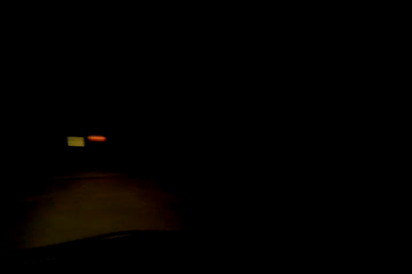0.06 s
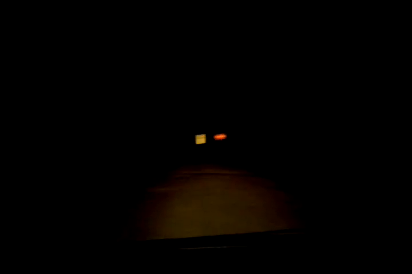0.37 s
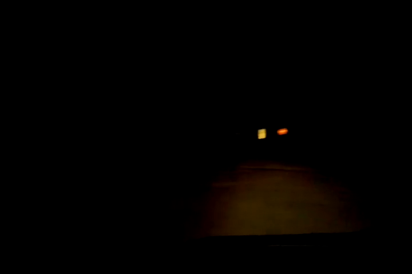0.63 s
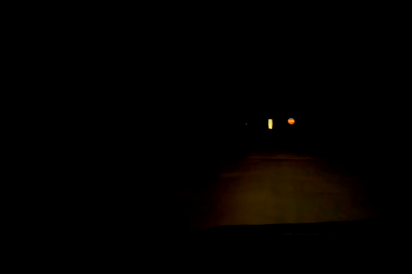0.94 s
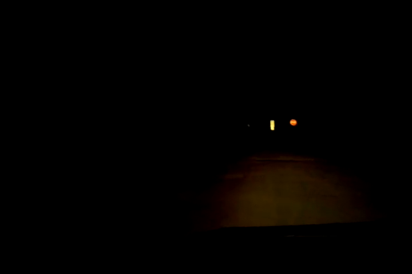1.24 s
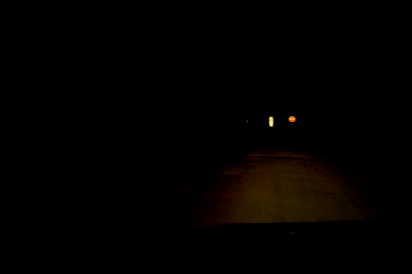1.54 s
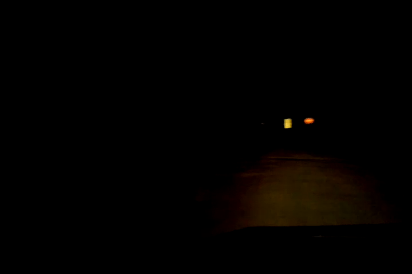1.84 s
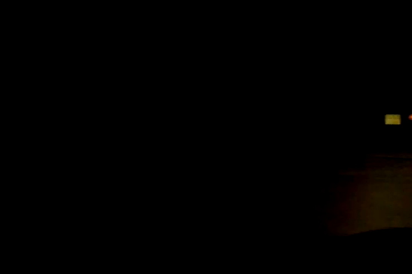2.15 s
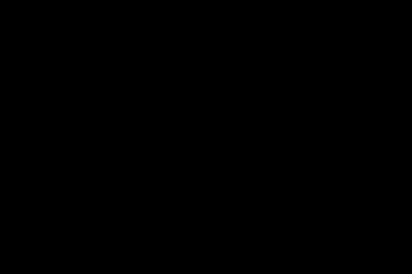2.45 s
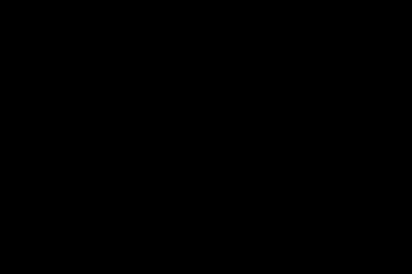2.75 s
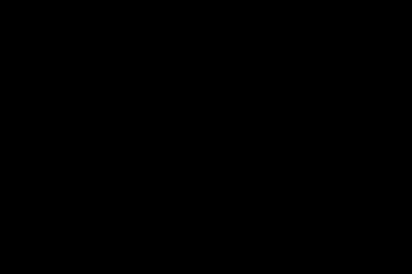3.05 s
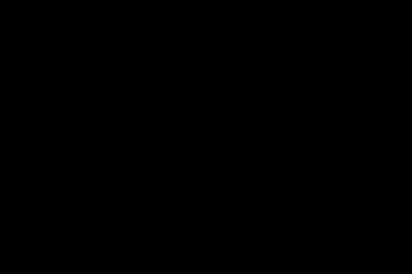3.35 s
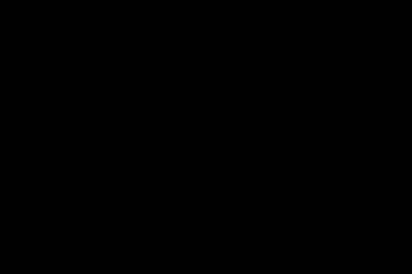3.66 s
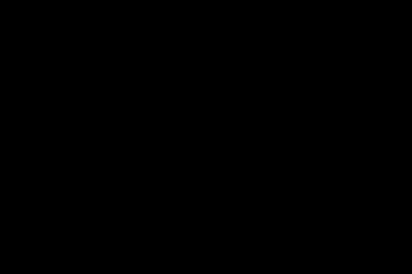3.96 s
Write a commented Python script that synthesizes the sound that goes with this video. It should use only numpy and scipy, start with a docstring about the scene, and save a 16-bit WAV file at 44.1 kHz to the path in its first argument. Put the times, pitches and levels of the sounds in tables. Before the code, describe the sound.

Many small frogs peep in a dense, high chorus over an idling car engine.

```python
"""Spring peepers from the roadside

Night by a pond, the microphone at an idling car. Each frog whistles a short rising peep: a few call
close by, hundreds merge across the water, and all echo among the trees. The engine thumps, whines and
rumbles under a hiss of fan and night air; its throb fades as the microphone turns away.
A soft rustle passes near the three-second mark."""
import sys
import numpy as np
from scipy import signal
from scipy.fft import rfft, irfft
from scipy.io import wavfile

SR = 44100
rng = np.random.default_rng(int(sys.argv[2]) if len(sys.argv) > 2 else 0)


def to_wav(s):
    """Save 16-bit WAV."""
    ch = np.atleast_2d(s).T  # columns
    pcm = np.round(np.clip(ch, -1, 1) * 32767)  # PCM
    wavfile.write(sys.argv[1], SR, pcm.astype(np.int16))


N = 176400

# Frogs close to the microphone: start_s, length_s, start_pitch_hz, rise_hz_per_s, level_db
NEAR_PEEPS = [(0.0, 0.066, 2990, 2540, -25.5), (.095, 0.049, 3250, 2750, -28.5),
              (.125, 0.023, 3630, 2500, -37), (.22, 0.084, 3090, 905, -32.5),
              (.315, 0.069, 3030, 2280, -29), (.32, 0.043, 3380, 3570, -27.5),
              (.4, 0.083, 3230, 3860, -23.5), (.455, 0.09, 3520, 2620, -30),
              (.487, 0.067, 2870, 1500, -34.5), (.508, 0.021, 3150, 5010, -25.5),
              (.542, 0.023, 3524, 3960, -27.5), (.57, 0.064, 2820, 2390, -33),
              (.59, 0.092, 3230, 2960, -29.5), (.665, 0.08, 3160, 1483, -28),
              (.66, 0.081, 3580, 1450, -35.5), (.772, .025, 2990, 2510, -32.5),
              (.79, 0.078, 3170, 2660, -28), (.92, 0.031, 3270, 2010, -31), (.99, 0.067, 3070, 3400, -29),
              (1.02, 0.041, 3370, 5000, -27), (1.195, 0.054, 2860, 1500, -39.5),
              (1.21, 0.046, 3300, 2030, -28.5), (1.235, 0.038, 3270, 1900, -31.5),
              (1.3, 0.072, 3000, 2600, -34), (1.345, 0.045, 3570, 2600, -32), (1.4, 0.11, 3070, 2600, -28),
              (1.54, 0.049, 2815, 2500, -38.5), (1.59, 0.021, 3210, 1510, -27),
              (1.68, 0.066, 3280, 3450, -26.5), (1.675, 0.055, 3080, 2470, -29),
              (1.73, 0.045, 3540, 2400, -36.5), (1.89, 0.082, 3030, 2730, -28),
              (2.005, 0.065, 3130, 4030, -30.5), (2.03, 0.068, 3410, 3000, -29),
              (2.04, 0.068, 3300, 2140, -31), (2.125, 0.05, 3160, 2610, -29),
              (2.18, 0.068, 2870, 2000, -35.5), (2.18, 0.061, 3560, 1900, -38),
              (2.235, .078, 3020, 2450, -25.5), (2.33, 0.057, 3610, 2060, -43),
              (2.405, 0.046, 3460, 1670, -37.5), (2.41, 0.064, 3060, 2620, -33),
              (2.57, 0.028, 3330, 1200, -26), (2.79, 0.042, 2880, 1500, -31.5),
              (3.035, 0.038, 3260, 2390, -25.5), (3.08, 0.023, 3080, 1720, -31),
              (3.315, 0.043, 2840, 2000, -45.5), (3.145, 0.059, 3190, 2520, -30.5),
              (3.285, 0.016, 3100, 2600, -38), (3.395, 0.11, 2870, 2290, -40.5),
              (3.655, 0.022, 3430, 2500, -27.5), (3.695, 0.074, 2870, 2020, -39.5),
              (3.828, .03, 3276, 3200, -28.5), (3.88, 0.022, 3240, 3540, -32)]
# Thin, much higher peeps: start_s, length_s, start_pitch_hz, rise_hz_per_s, level_db
HIGH_PEEPS = [(.41, 0.062, 5070, 4570, -55), (0.509, 0.035, 5100, 5500, -52.5),
              (.635, 0.072, 4530, 3720, -50), (.78, 0.054, 4860, 3500, -52.5),
              (1.01, 0.038, 5170, 5540, -52.5), (1.355, .075, 4550, 3000, -52.5),
              (1.49, 0.05, 5080, 4090, -58)]
# Tone of the chorus across the pond: frequency_hz, relative_db
POND_SPECTRUM = [(1590, -64.5), (2700, -23.5), (2820, -16.5), (3020, -4.5), (3190, 1), (3320, 2),
                 (3520, -2), (3660, -6), (3770, -7), (3900, -38.5), (5070, -49), (8580, -120)]
# Swell and ebb of that chorus: time_s, level_db
POND_LEVEL = [(0, -28), (.5, -32), (1.0, -31), (1.55, -29), (1.83, -32), (2.1, -31.5), (2.6, -30),
              (3.2, -28.5), (3.55, -30.5), (4, -29)]
# Microphone's turn from the engine (0 facing it, 1 fully away): time_s, turned_share
MIC_TURN = [(0, 0), (2.25, 0), (2.55, 0.1), (2.9, 0.48), (4, 0.57)]
# Engine harmonics: multiple_of_firing_rate, facing_db, away_db
ENGINE_ORDERS = [(.5, -32, -47), (1, -31.5, -51), (1.5, -46, -55), (2, -38, -46.5), (3, -45, -45.5),
                 (6, -62, -68)]
# Whine of belts and fan: pitch_hz, facing_db, away_db
BELT_FAN_WHINES = [(174, -54.5, -61.5), (190, -61, -62.5), (282.8, -58.5, -66), (345.5, -62.5, -63.5),
                   (415, -62, -67), (630, -68.5, -66), (1031, -71, -60.5), (1141, -66.5, -69)]
# Rumble of the car's body: frequency_hz, relative_db
RUMBLE_SPECTRUM = [(12, 8), (25, 7), (48, 0.5), (62, -10), (90, -14), (125, -19), (230, -37.5)]
# Drone of the engine: frequency_hz, relative_db
DRONE_SPECTRUM = [(60, -0.5), (90, -2), (125, 2), (170, -1), (230, -14.5), (350, -11.5), (500, -22.5),
                  (900, -38)]
# Hiss of fan and night air: frequency_hz, relative_db
AIR_SPECTRUM = [(200, 5.5), (500, 3), (800, 2.5), (1200, 1.5), (1800, 0.5), (2250, -0.5), (2550, -3),
                (4100, -3), (5000, -3), (6000, -8), (7200, -20)]
# Brushing strokes: start_s, length_s, peak_db
RUSTLE_STROKES = [(2.78, 0.43, -46.5), (3.25, 0.56, -53.5), (3.703, 0.3, -50.5)]
# Tone of the brushing: frequency_hz, relative_db
RUSTLE_SPECTRUM = [(800, -18.5), (2000, -9), (4000, 1), (5300, -3), (6300, -10.5), (7300, -25.5)]

ATTACK_SHARE, RELEASE_SHARE = 0.2, .25  # of a peep's length
FLUTTER_DB, WAVER_SHARE, OCTAVE_DB = 0.26, 0.0026, -46.5
CHORUS_PEEP_S, CHORUS_RISE_HZ_PER_S, CHORUS_SPREAD_DB = .08, 2495, 1.5
POND_PEEPS_PER_S, POND_LOW_HZ, POND_HIGH_HZ = 180, 2892, 3655
HIGH_HZ, HIGH_SPREAD_HZ, HIGH_DB = 5014, 210, -57.5
LOW_HZ, LOW_SPREAD_HZ, LOW_DB, LOW_RISE_HZ_PER_S = 2210, 70, -62, 440
TREES_T60_S, NEAR_ECHO_DB, FAR_ECHO_DB = 0.72, -9, -6.5
FIRING_HZ, FIRST_THUMP_S, IDLE_WANDER_SHARE = 36.24, .008, .008
SMEAR_RAD, THROB_DEPTH = .9, 0.3
TREBLE_CUT_HZ = 7300


def undb(db):
    """Decibels to gain."""
    return 10 ** (np.asarray(db) / 20)


def unit_rms(x):
    """Scale to rms 1."""
    return x / np.sqrt(np.mean(x ** 2))


def curve(rows):
    """Join (time_s, value) rows by straight lines."""
    return np.interp(np.arange(N) / SR, *np.array(rows).T)


def wander(rate_hz):
    """Smooth random drift of rms 1, mostly slower than rate_hz."""
    freq = np.arange(N // 2 + 1) * SR / N
    lowpass = np.exp(-2 * (freq / rate_hz) ** 2) * (freq > 0)
    return unit_rms(irfft(rfft(rng.standard_normal(N)) * lowpass, N))


def colour(x, spectrum):
    """Filter by (frequency_hz, relative_db) rows, rolling off past both ends; scale to rms 1."""
    freq = np.maximum(np.arange(N // 2 + 1) * SR / N, 1)
    hz, db = np.array(spectrum).T
    rolloff = np.minimum(freq / hz[0], 1) ** 2 * np.minimum(hz[-1] / freq, 1) ** 10
    gain = undb(np.interp(np.log(freq), np.log(hz), db))
    return unit_rms(irfft(rfft(x) * rolloff * gain, N))


def add(out, start_s, x):
    """Mix x into out from start_s on."""
    offset = int(start_s * SR)
    first, last = max(offset, 0), min(offset + len(x), N)
    if last > first:
        out[first:last] += x[first - offset:last - offset]


def peeps(rows):
    """Frogs' rising whistles that swell, hold and stop, with a slight flutter and a faint octave."""
    out = np.zeros(N)
    flutter = undb(FLUTTER_DB * wander(170))
    waver = 1 + WAVER_SHARE * wander(65)
    for start, length, hz, rise, db in rows:
        t = np.arange(int(max(length, .01) * SR)) / SR
        place, start_cycle = rng.random(2)
        stretch = (int(place * N) + np.arange(len(t))) % N  # each peep flutters and wavers its own way
        pitch = (hz + rise * t) * waver[stretch]
        phase = 2 * np.pi * (start_cycle + np.cumsum(pitch) / SR)
        tone = np.sqrt(2) * (np.sin(phase) + undb(OCTAVE_DB) * np.sin(2 * phase))
        ramp = np.minimum(t / ATTACK_SHARE, (length - t) / RELEASE_SHARE) / length
        envelope = np.sin(np.pi / 2 * np.clip(ramp, 0, 1)) ** 2
        add(out, start, undb(db) * envelope * flutter[stretch] * tone)
    return out


def among_trees(direct, echo_db):
    """The direct sound plus echoes scattered back from trunks and the bank."""
    t = np.arange(SR) / SR
    build_up = 1 - np.exp(-t / 0.0065)
    decay = np.exp(-np.log(1000) * t / TREES_T60_S)
    tail = rng.standard_normal(SR) * build_up * decay
    echoes = signal.fftconvolve(direct, tail / np.linalg.norm(tail))[:N]
    return direct + undb(echo_db) * echoes


def far_chorus(mid_pitches_hz, rise_hz_per_s):
    """Distant frogs: one peep per pitch, each at a random moment in its own time slot; rms 1."""
    count = len(mid_pitches_hz)
    start_share = (np.arange(count) + rng.random(count)) / count
    start = start_share * (N / SR + CHORUS_PEEP_S) - CHORUS_PEEP_S
    long, steep, loud = rng.standard_normal((count, 3)).T
    length = CHORUS_PEEP_S * np.exp(0.196 * long)
    rise = rise_hz_per_s * np.exp(0.2655 * steep)
    start_pitch = mid_pitches_hz - rise * length / 2
    level_db = CHORUS_SPREAD_DB * np.minimum(loud, 1.5)
    rows = np.column_stack([start, length, start_pitch, rise, level_db])
    return unit_rms(among_trees(peeps(rows), FAR_ECHO_DB))


def frogs():
    """Close callers in front, the whole pond behind, and faint higher and lower choruses far off."""
    near = among_trees(peeps(NEAR_PEEPS + HIGH_PEEPS), NEAR_ECHO_DB)
    high = undb(HIGH_DB) * far_chorus(rng.normal(HIGH_HZ, HIGH_SPREAD_HZ, 320), CHORUS_RISE_HZ_PER_S)
    low = undb(LOW_DB) * far_chorus(rng.normal(LOW_HZ, LOW_SPREAD_HZ, 240), LOW_RISE_HZ_PER_S)
    pond_pitches = rng.uniform(POND_LOW_HZ, POND_HIGH_HZ, int(POND_PEEPS_PER_S * N / SR))
    pond = colour(far_chorus(pond_pitches, CHORUS_RISE_HZ_PER_S), POND_SPECTRUM)
    return near + high + low + pond * undb(curve(POND_LEVEL))


def mic_gain(facing_db, away_db):
    """Gain that moves partway from facing_db to away_db as the microphone turns from the engine."""
    return undb(facing_db + (away_db - facing_db) * curve(MIC_TURN))


def engine_tone(phase, rough_db):
    """One tone of the engine, its level trembling at random."""
    return -np.sqrt(2) * np.cos(phase) * undb(rough_db * wander(25))


def idling_car():
    """Harmonics in step thump strong and weak by turns; belts and fan whine, the body rumbles."""
    speed = 1 + IDLE_WANDER_SHARE * wander(5)
    crank = 2 * np.pi * (np.cumsum(speed) / SR - FIRST_THUMP_S)  # phase per Hz, drifting with the idle
    lag = SMEAR_RAD * curve(MIC_TURN)  # turned away, higher harmonics lag and thumps blur into a hum
    thumps = sum(engine_tone(order * FIRING_HZ * crank - lag * order ** 2, rough_db=1.3)
                 * mic_gain(facing, away) for order, facing, away in ENGINE_ORDERS)
    whine = sum(engine_tone(hz * crank + 2 * np.pi * rng.random(), rough_db=3)
                * mic_gain(facing, away) for hz, facing, away in BELT_FAN_WHINES)
    rumble = colour(rng.standard_normal(N), RUMBLE_SPECTRUM) * mic_gain(facing_db=-35, away_db=-48.5)
    throb = 1 + THROB_DEPTH * np.cos(FIRING_HZ * crank)
    drone = colour(rng.standard_normal(N) * throb, DRONE_SPECTRUM)
    return thumps + whine + rumble + drone * mic_gain(facing_db=-44, away_db=-54)


def air_hiss():
    """Even hiss of the fan and the night air, a little softer once the microphone turns."""
    hiss = colour(rng.standard_normal(N), AIR_SPECTRUM)
    return hiss * mic_gain(facing_db=-47.5, away_db=-51.5) * undb(.5 * wander(13))


def rustle():
    """Soft, grainy brushing, as of a sleeve, that swells and dies with each stroke."""
    swell = np.zeros(N)
    for start, length, db in RUSTLE_STROKES:
        add(swell, start, undb(db) * np.sin(np.linspace(0, np.pi, int(length * SR))))
    brushing = colour(rng.standard_normal(N), RUSTLE_SPECTRUM)
    return swell * brushing * undb(1.3 * wander(90))


def scene():
    """Frogs, car, air and rustle at one roadside microphone."""
    return (frogs() + idling_car() + air_hiss() + rustle())[None]


def record(dry):
    """The recorder cuts the treble steeply."""
    lowpass = signal.ellip(10, .2, 80, TREBLE_CUT_HZ, fs=SR, output="sos")
    return signal.sosfilt(lowpass, dry)


dry = scene()
out = record(dry)
to_wav(out)
```